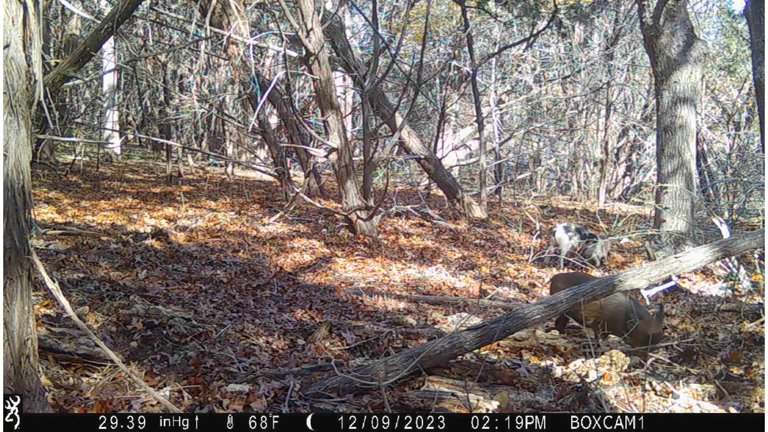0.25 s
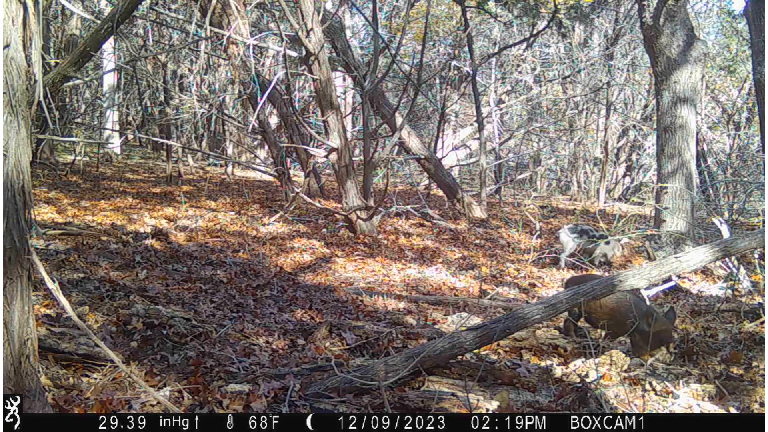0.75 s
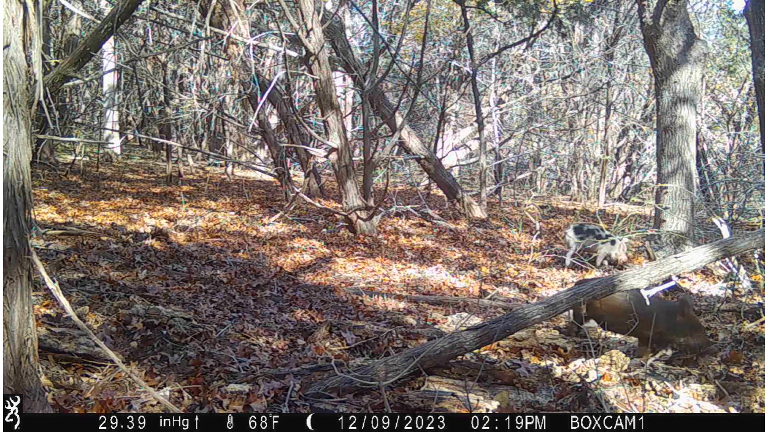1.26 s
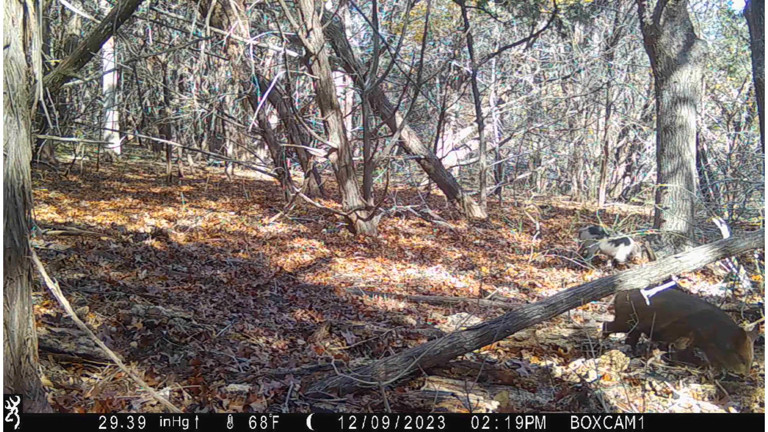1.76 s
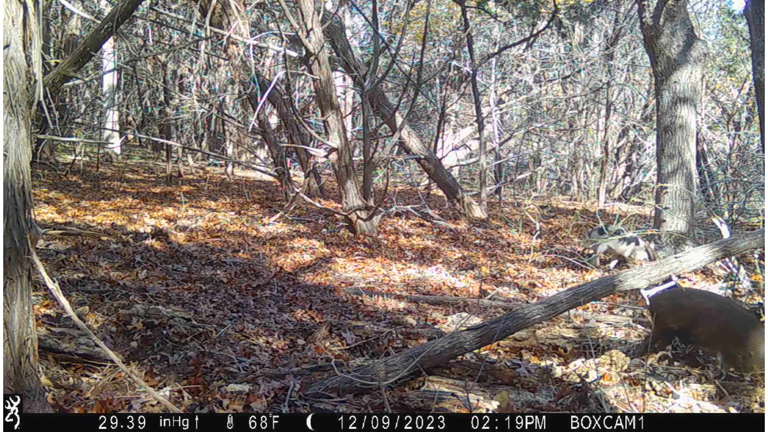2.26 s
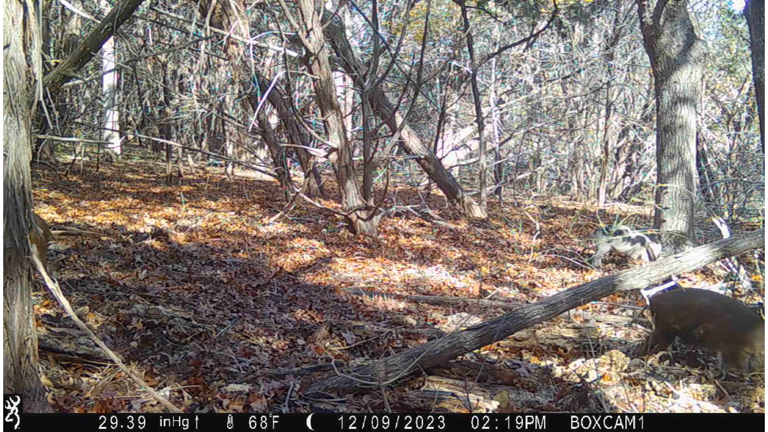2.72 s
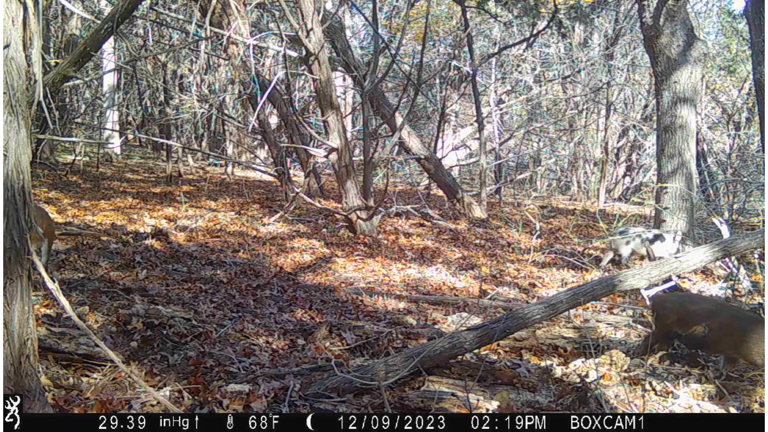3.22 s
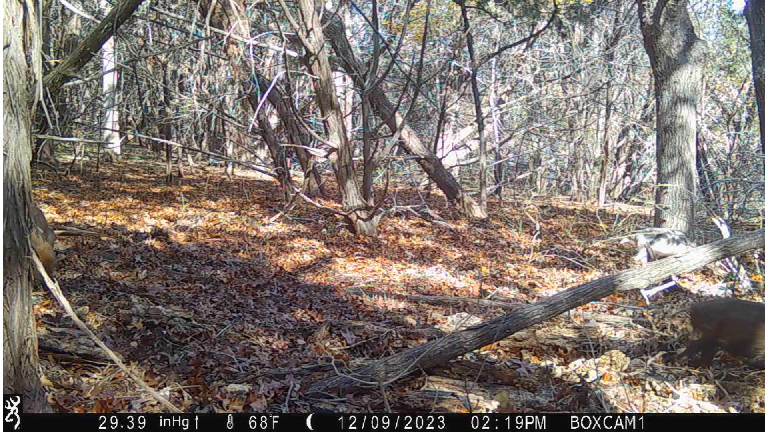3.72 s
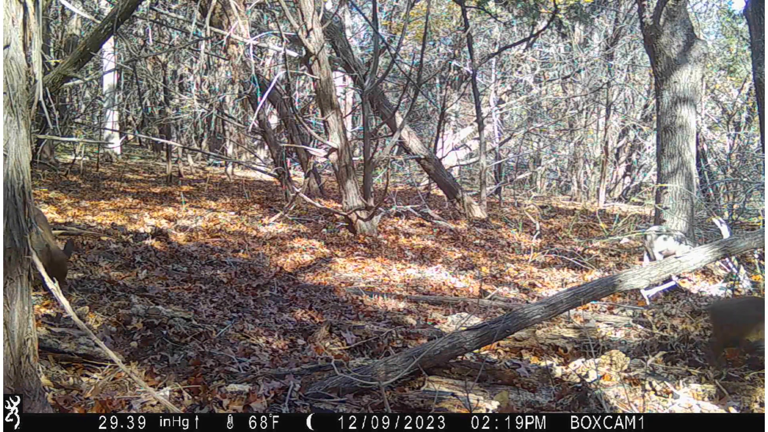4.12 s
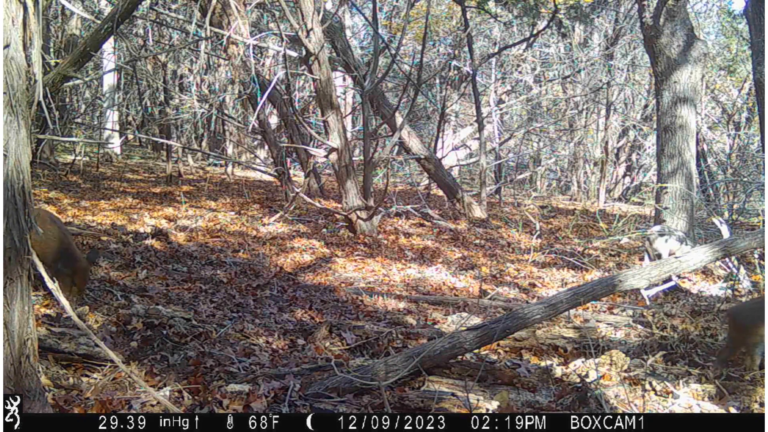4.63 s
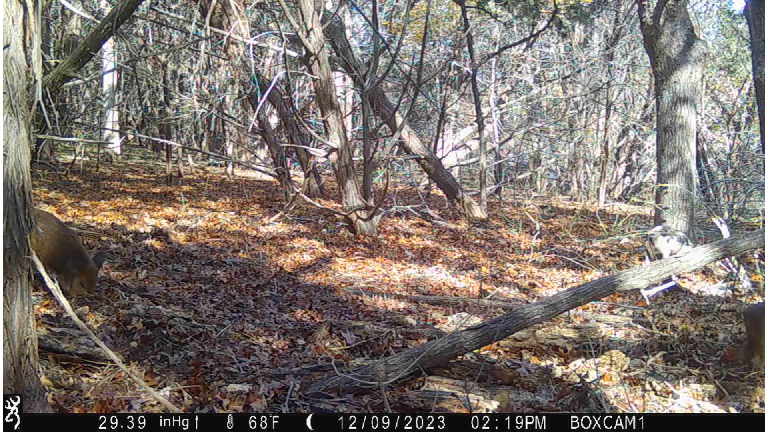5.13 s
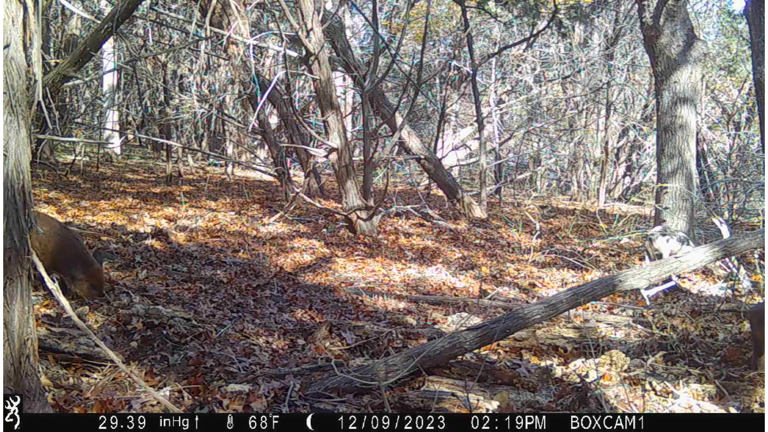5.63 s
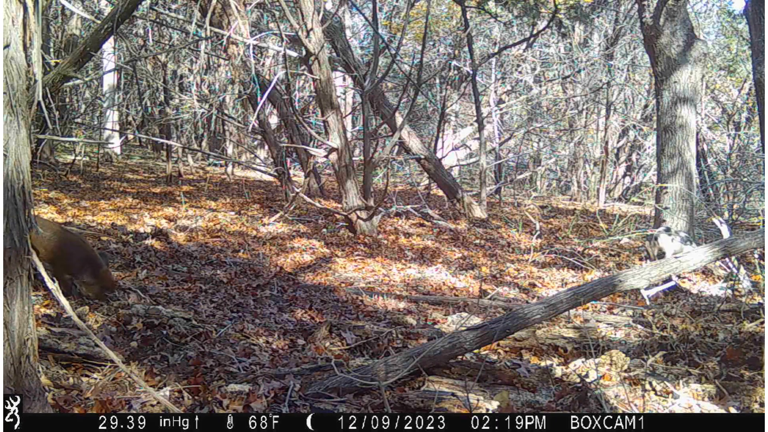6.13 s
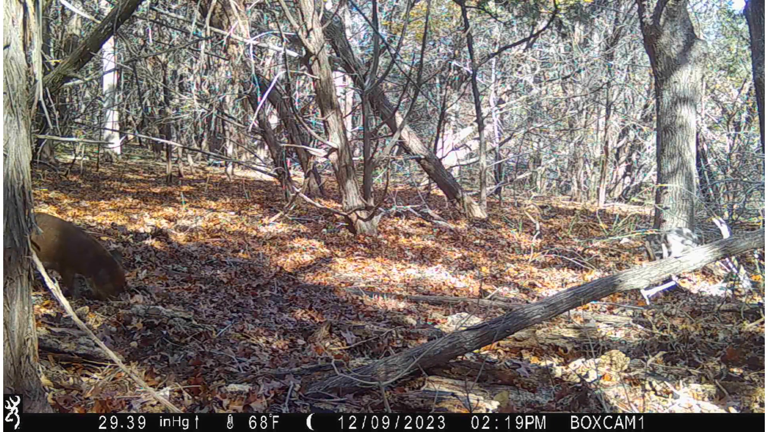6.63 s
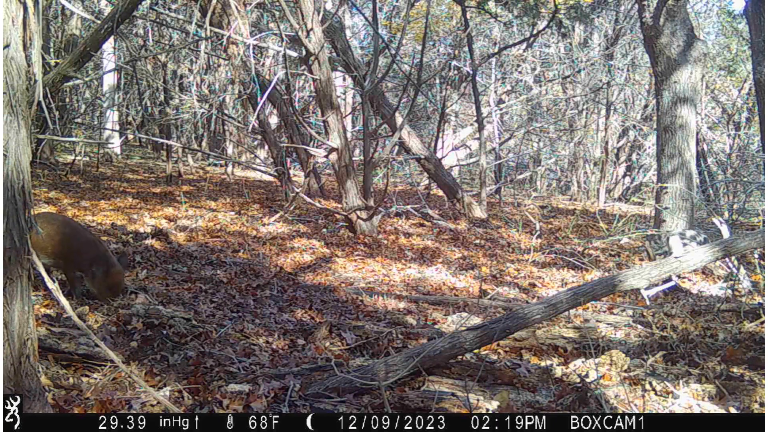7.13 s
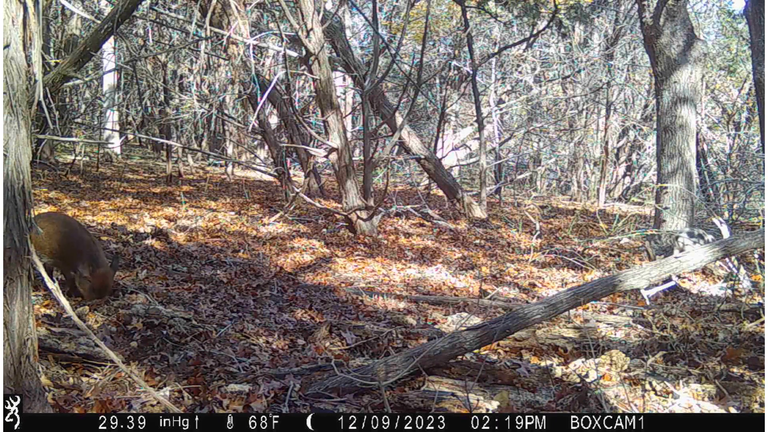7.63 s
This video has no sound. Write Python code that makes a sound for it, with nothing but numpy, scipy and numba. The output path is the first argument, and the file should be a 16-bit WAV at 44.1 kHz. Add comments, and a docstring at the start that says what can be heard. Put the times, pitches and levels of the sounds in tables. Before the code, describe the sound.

Dry leaves crackle and shuffle throughout as wild hogs forage across a woodland floor, heard from several metres away. Hooves and snouts shove the litter in quick irregular surges, and thin twigs break with brief clicks, most often in the first half. The rustling softens a little, then grows stronger again toward the end. The trees add barely any echo, and a soft even hiss fills the background.

```python
"""Wild hogs in dry leaves

Hogs root and walk through deep dry leaves in a wood, some metres away. Thousands of tiny
leaf fractures merge into a surging rustle; hooves crush stiff leaves and snap twigs.
Trunks scatter the sound a little; under it lie a faint steady hiss and a weak low hum."""
import sys
import numpy as np
from scipy import signal
from scipy.fft import rfft, irfft
from scipy.io import wavfile
from numba import njit

SR = 44100
rng = np.random.default_rng(int(sys.argv[2]) if len(sys.argv) > 2 else 0)


def output_pcm(signal):
    """Save a mono or channel-first signal as 16-bit PCM at the path in sys.argv[1].

    Samples are clipped to [-1, 1] before scaling.
    """
    pcm = np.clip(np.atleast_2d(signal).T, -1, 1) * 32767
    wavfile.write(sys.argv[1], SR, np.round(pcm).astype(np.int16))


N = 347067
TIME = np.arange(N) / SR


def undb(db):
    """Decibels to gain."""
    return 10 ** (np.asarray(db) / 20)


def unit(x):
    """Scale to rms 1."""
    return x / np.sqrt(np.mean(x ** 2))


def wander(rate_hz):
    """Slow random drift with a spread near 1."""
    knots = rng.standard_normal(4000)
    return 1.2 * np.interp(TIME * rate_hz, np.arange(len(knots)), knots)


def colour(x, points, size=4096):
    """Minimum-phase EQ through (freq_hz, gain_db) points, so clicks keep their sharp attack."""
    hz, db = np.transpose(points)
    grid_hz = np.maximum(np.arange(size // 2 + 1) * SR / size, 1)
    gain = undb(np.interp(np.log(grid_hz), np.log(hz), db))
    cepstrum = irfft(np.log(gain))
    cepstrum[1:size // 2] *= 2
    cepstrum[size // 2 + 1:] = 0
    impulse = irfft(np.exp(rfft(cepstrum)))
    return signal.fftconvolve(x, impulse)[:N]


def below(x, hz):
    """Soft zero-phase low-pass."""
    return signal.sosfiltfilt(signal.butter(2, hz, fs=SR, output="sos"), x)


@njit
def rings(times, hz, sizes, cycles):
    """Sum of damped sines; each falls to 1/e in the given number of cycles."""
    out = np.zeros(N)
    for k in range(len(times)):
        step = min(hz[k], .45 * SR) / SR
        pole = np.exp(step * (2j * np.pi - 1 / cycles))
        phasor = sizes[k] + 0j
        start = int(times[k] * SR)
        for i in range(max(start, 0), min(N, start + int(5 * cycles / step))):
            out[i] += phasor.imag
            phasor *= pole
    return out


def hiss(level_db=-41):
    """A faint, steady bed of broad noise."""
    # tone of the hiss: freq_hz, relative_db
    hiss_eq = [(20, -6), (80, -1), (105, -2), (130, -4.5), (220, -4.5), (330, 2), (520, 2), (900, 4),
               (2200, 2.5), (5500, 0.5), (7200, -13.5), (11600, -13), (13800, -28), (15700, -26)]
    return undb(level_db) * unit(colour(rng.standard_normal(N), hiss_eq))


def hum(waver_hz=2.56, waver_db=2):
    """Two weak, wavering low tones; the lower swells as the upper fades."""
    # hum tones: pitch_hz, start_rms_db, end_rms_db
    tones = [(72, -78, -73), (143.3, -65.5, -80.5)]
    out = np.zeros(N)
    for pitch_hz, start_db, end_db in tones:
        phase = 2 * np.pi * np.cumsum(pitch_hz + waver_hz * wander(9)) / SR
        level_db = np.linspace(start_db, end_db, N) + waver_db * wander(5.5)
        out += unit(np.sin(phase)) * undb(level_db)
    return out


def trunks(x, t60_s=.19, send_db=-17):
    """Faint scattered echoes from tree trunks, duller than the direct sound."""
    t = TIME[:SR // 2]
    echoes = rng.standard_normal(len(t)) * undb(-60 * t / t60_s) * (t > .004)
    echoes /= np.sqrt(np.sum(echoes ** 2))
    return undb(send_db) * below(signal.fftconvolve(x, echoes)[:N], 6000)


def twig_snaps(splinter_db=-7, fibres=6, pitch_spread=.12):
    """One main break rings the twig briefly, then its last fibres tear."""
    # breaking twigs and stalks: start_s, level_db (over 5 ms, before the EQ), pitch_hz, splinter_s
    breaks = [(0.147, -28.5, 5150, .0024), (0.24, -30.5, 5200, .0022), (0.24, -32, 11000, .002),
              (0.4142, -26.5, 4520, .0013), (0.4214, -31.5, 1650, 0.0016), (0.528, -33, 4800, .0006),
              (0.585, -31, 4600, 0.0028), (0.5955, -27, 4370, .0014), (0.6168, -31, 5360, 0.00021),
              (0.783, -34.5, 1690, 0.0052), (1.339, -29, 5000, .003), (1.3657, -26.5, 5200, .0027),
              (1.7, -35, 3600, 0.0041), (1.998, -31, 4700, .002), (2.628, -33.5, 4870, 0.0072),
              (3.032, -31, 5400, .002), (3.1357, -29, 3160, 0.0016), (3.14, -33, 1490, 0.0038),
              (3.271, -32, 4400, 0.00077), (3.286, -33, 4500, .001), (3.4605, -35, 1900, 0.001),
              (3.4644, -27.5, 2940, 0.00057), (4.162, -34.5, 1770, .0023), (4.2039, -29.5, 6060, 0.0025),
              (4.2055, -26.5, 2070, 0.00097), (4.276, -32.5, 4800, .005), (4.4495, -37, 5000, 0.00038),
              (5.075, -37, 10500, .0067), (5.549, -34, 4970, 0.002), (5.8305, -33, 2400, 0.001),
              (6.227, -34, 7000, .002), (6.402, -43, 11000, 0.0018), (6.425, -38, 11000, .002),
              (6.846, -35, 2400, .003), (7.027, -34, 5300, 0.0048)]
    out = np.zeros(N)
    for start_s, level_db, pitch_hz, splinter_s in breaks:
        lag, detune, strength = rng.standard_normal((3, fibres))
        times = start_s + np.append(0, splinter_s * abs(lag))
        pitches = pitch_hz * np.exp(np.append(0, pitch_spread * detune))
        sizes = np.append(1, undb(splinter_db) * np.tanh(2 * strength))
        snap = rings(times, pitches, sizes, cycles=1.4)
        # a thin stick radiates little below its own pitch
        low_cut = signal.butter(2, .7 * pitch_hz, "high", fs=SR, output="sos")
        snap = signal.sosfilt(low_cut, snap + 1e-18)
        out += undb(level_db) * snap / np.sqrt(np.sum(snap ** 2) / (.005 * SR))
    return colour(out, [(6000, 0), (7500, -7), (11800, -1), (13600, -22)])


def crackle(leaves_per_s=2200, crumple_s=.0015, force_db=1.5, pitch_spread=.3, cracks=6):
    """Each leaf buckles in a quick run of cracks around its own pitch."""
    leaves = int(leaves_per_s * N / SR)
    when, pitch, force = rng.random((3, leaves, 1))
    lag, detune = rng.standard_normal((2, leaves, cracks))
    times = when * N / SR + crumple_s * lag ** 2  # most cracks come at once, a few straggle
    leaf_hz = 500 * 32 ** pitch  # 500 Hz to 16 kHz
    hz = leaf_hz * np.exp(pitch_spread * detune)
    force = np.minimum(-np.log(1 - force), 4)  # many gentle, a few hard
    # high cracks are shorter, so they need more height for the same share of the spectrum
    sizes = hz * undb(force_db * force) * np.sign(lag) * (hz < .42 * SR)
    return unit(rings(times.ravel(), hz.ravel(), sizes.ravel(), cycles=1.6))


def jerks(per_s=64, settle_s=.029):
    """The litter jolts and settles again: a flutter around 0 with rms 1."""
    jolts = rng.random(N) < per_s / SR
    decay = np.exp(-1 / (settle_s * SR))
    return unit(signal.lfilter([1], [1, -decay], jolts - per_s / SR))


def stirring(shuffle_db=-42.5, shuffle_crisp_db=1.5, shuffle_deep_db=2.5, attack_share=.48, settle_s=.12):
    """Shoves over the herd's constant shuffle, as envelopes: all leaves, crisp top, deep litter."""
    # a hoof or snout shoves the leaves: start_s, push_s, level_db, crisp_offset_db, deep_offset_db
    shoves = [(-0.11, .26, -35.5, -0.5, -1), (0.186, .22, -35, 2.5, -1), (0.428, .19, -33, -2.5, -2.5),
              (0.73, 0.09, -36.5, .5, -1), (0.95, .09, -38, -2, -1), (1.11, 0.066, -38.5, 4.5, -1.5),
              (1.26, .09, -32, 1, -3), (1.484, .05, -40.5, 0, 2), (1.58, 0.25, -34.5, .5, 0.5),
              (1.875, .22, -32.5, -0.5, -1), (2.214, 0.095, -34, -2.5, -5), (2.37, 0.15, -41.5, 0, 3),
              (2.76, .05, -44.5, 6, 6), (2.834, .2, -34.5, -1.5, -0.5), (3.094, .05, -34, 0.5, 1.5),
              (3.158, 0.23, -36, 0, 2), (3.4, 0.26, -37, 3, 3), (3.672, 0.095, -34.5, 1, 3),
              (3.782, .19, -36, -1, 1), (3.96, 0.39, -39, 0.5, 0), (4.392, .12, -35, 0.5, 1.5),
              (4.55, .17, -37.5, 1.5, 4), (4.76, 0.19, -38, 0, -3), (5.02, .04, -39, 1.5, -1),
              (5.175, 0.15, -39, 2.5, 4), (5.328, 0.27, -37.5, -2, 2.5), (5.59, 0.17, -38, 0.5, -1.5),
              (5.82, 0.095, -37.5, 0, -3), (6.063, 0.34, -35.5, -1.5, -1.5), (6.44, 0.25, -38, 0, -1),
              (6.642, 0.23, -33.5, -2, 2), (6.878, 0.16, -33, -1, 0), (7.235, 0.23, -35, -1.5, .5),
              (7.5, 0.25, -38.5, -4, -1), (7.82, 0.09, -34.5, 0, 4.5)]
    power = undb(shuffle_db + np.array([[0], [shuffle_crisp_db], [shuffle_deep_db]])) ** 2
    for start_s, push_s, level_db, crisp_db, deep_db in shoves:
        age = TIME - start_s
        attack = np.clip(age / (attack_share * push_s), 0, 1)
        release = np.exp(-np.maximum(age - push_s, 0) / settle_s)
        gains = undb(level_db + np.array([[0], [crisp_db], [deep_db]]))
        power = power + (gains * attack * release) ** 2
    return np.sqrt(power)


def rustle(slide_db=-1, ticks_db=-11, ticks_per_s=80, jerk_db=.62, crisp_trim_db=-1.04, deep_trim_db=-.1):
    """Leaves crack and slide in small jerks; the dry top layer is crisp, the deep litter duller."""
    # tone of dry leaves: freq_hz, relative_db
    leaf_eq = [(150, -29.5), (350, -19), (800, -8), (1400, -3), (2200, -0.5), (3700, -2), (5500, 1),
               (6200, -5.5), (7200, -12), (9000, -15), (11600, -10.5), (12700, -19.5), (13800, -32),
               (15700, -27)]
    cracks = crackle()
    # single brittle edges flick with a sharp broad tick
    ticks = unit(np.tanh(rng.standard_normal(N)) * (rng.random(N) < ticks_per_s / SR))
    slide = rng.standard_normal(N)
    leaves = unit(colour(cracks + undb(slide_db) * slide + undb(ticks_db) * ticks, leaf_eq))
    lows, up_to_mids, up_to_highs = (below(leaves, hz) for hz in (1250, 3000, 6600))
    effort, crisp, deep = stirring()
    # harder stirring mostly adds bright cracks; the lowest rustle swells less
    bottom = lows * effort.mean() * (effort / effort.mean()) ** .46
    body = (up_to_mids - lows) * deep * undb(deep_trim_db)
    crunch = (up_to_highs - up_to_mids) * effort
    top = (leaves - up_to_highs) * crisp * undb(crisp_trim_db)
    return (bottom + body + crunch + top) * undb(jerk_db * jerks())


def scene():
    """The hogs among the trees, over hiss and hum, in mono."""
    hogs = rustle() + twig_snaps()
    return (hogs + trunks(hogs) + hiss() + hum())[None]


def record(dry):
    """A steep low-pass cuts the top above 15.7 kHz."""
    return signal.sosfilt(signal.ellip(10, .2, 80, 15700, fs=SR, output="sos"), dry)


dry = scene()
out = record(dry)
output_pcm(out)
```